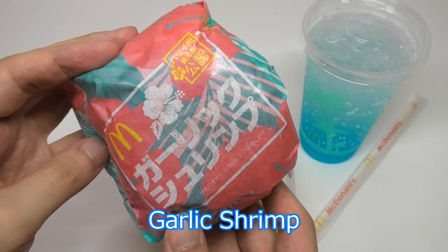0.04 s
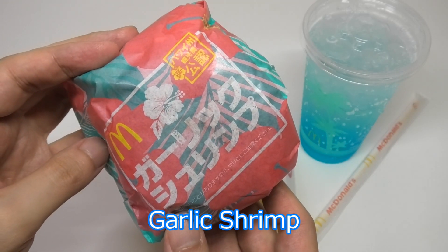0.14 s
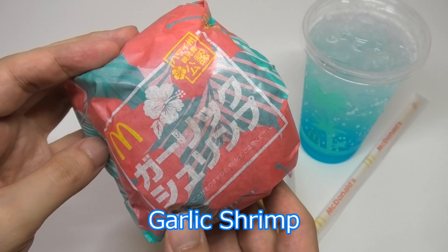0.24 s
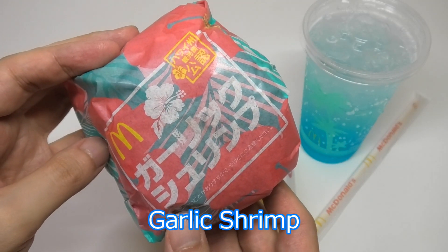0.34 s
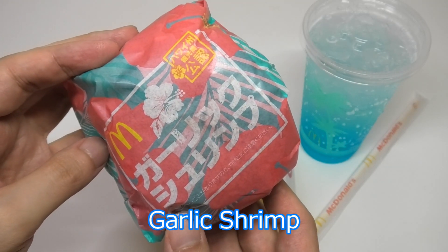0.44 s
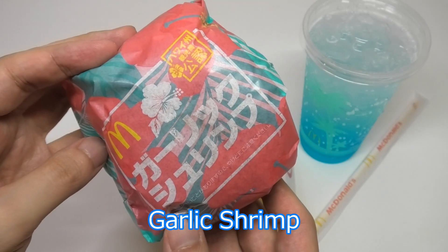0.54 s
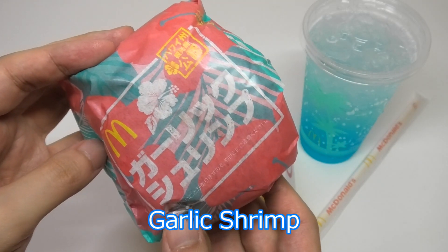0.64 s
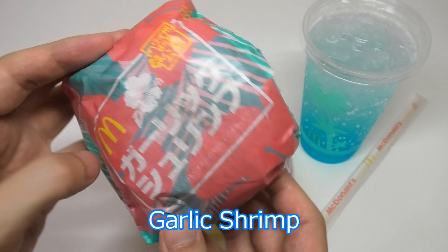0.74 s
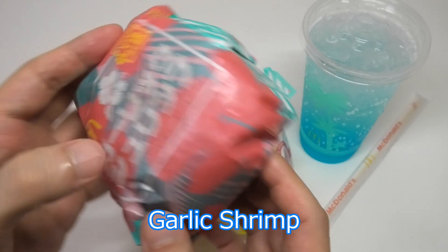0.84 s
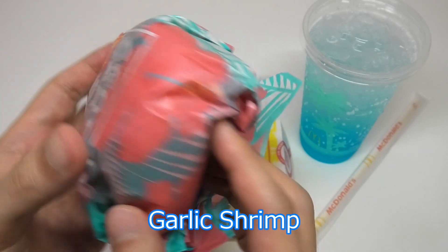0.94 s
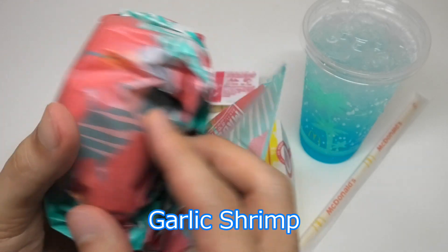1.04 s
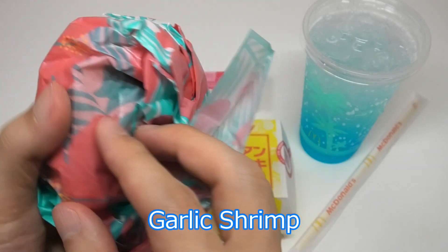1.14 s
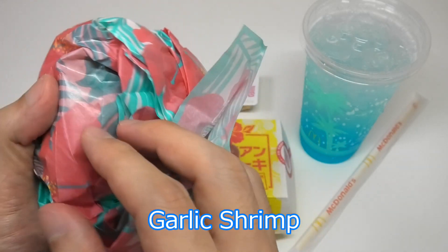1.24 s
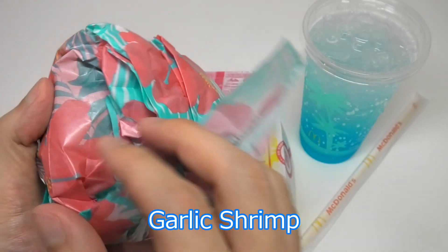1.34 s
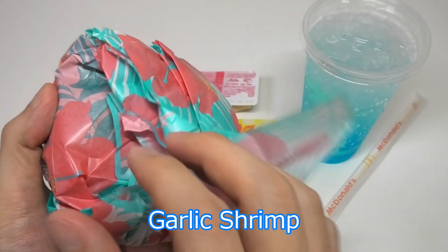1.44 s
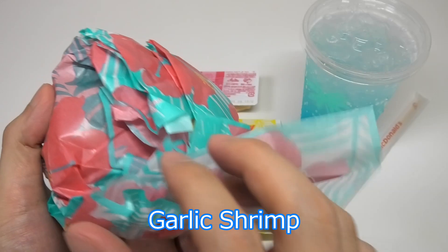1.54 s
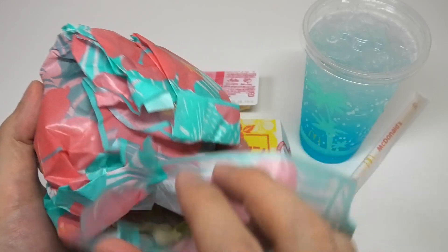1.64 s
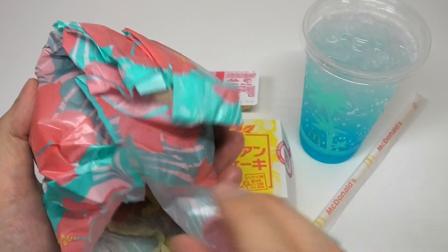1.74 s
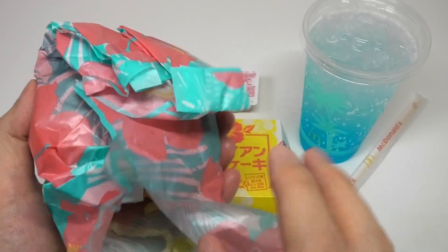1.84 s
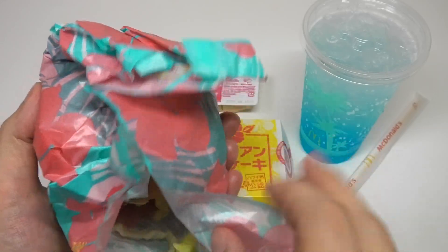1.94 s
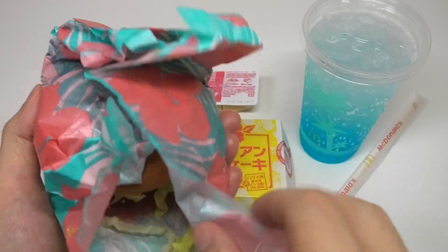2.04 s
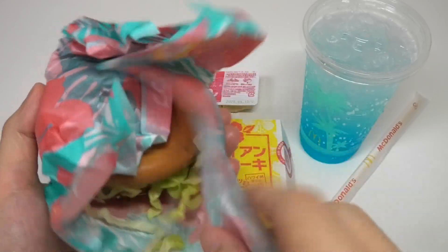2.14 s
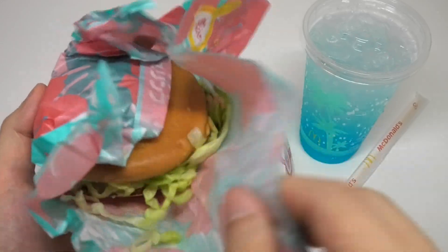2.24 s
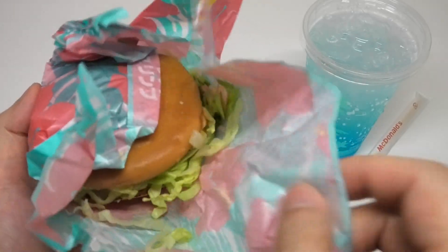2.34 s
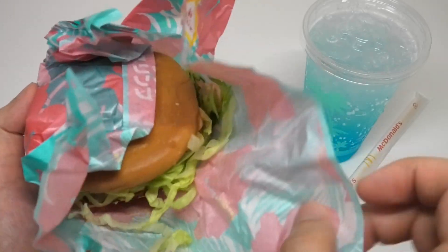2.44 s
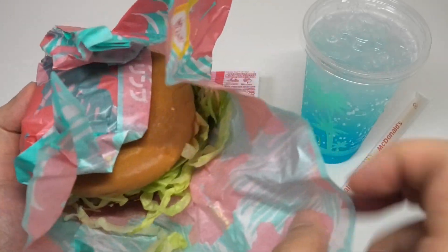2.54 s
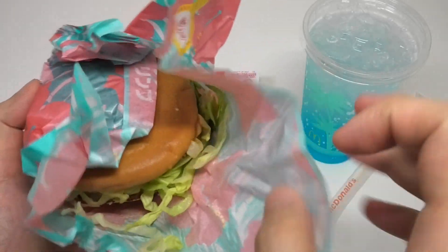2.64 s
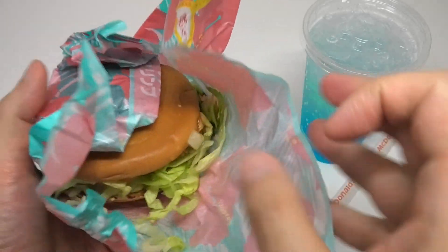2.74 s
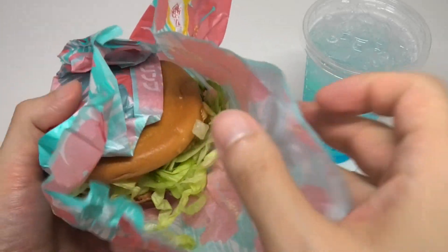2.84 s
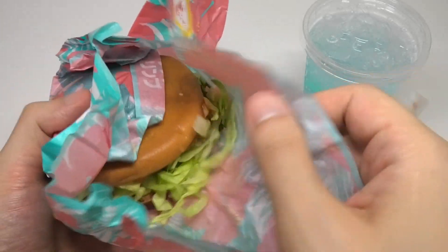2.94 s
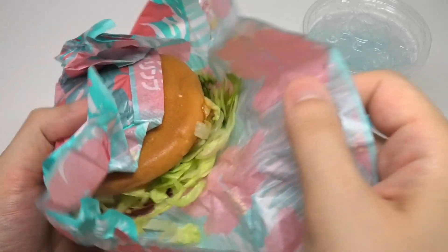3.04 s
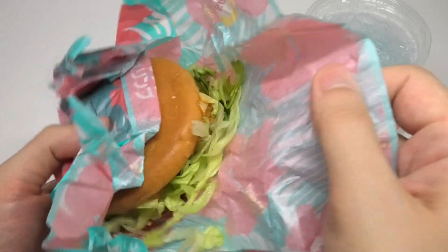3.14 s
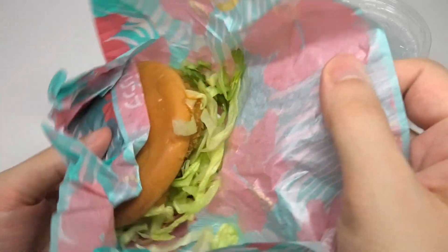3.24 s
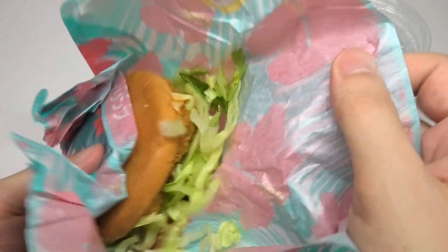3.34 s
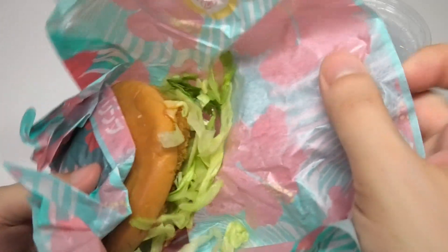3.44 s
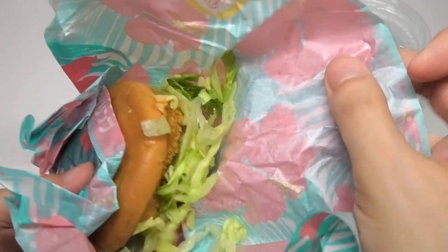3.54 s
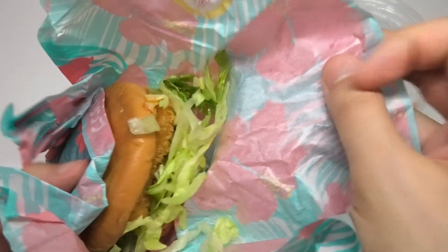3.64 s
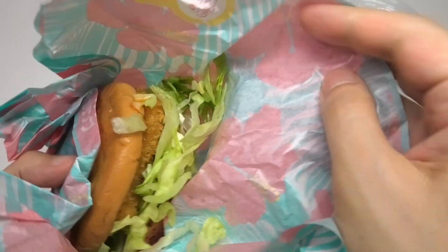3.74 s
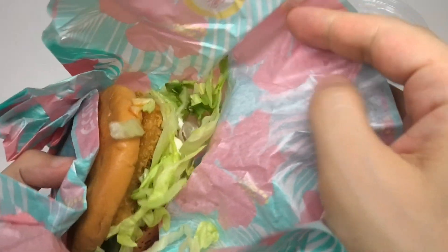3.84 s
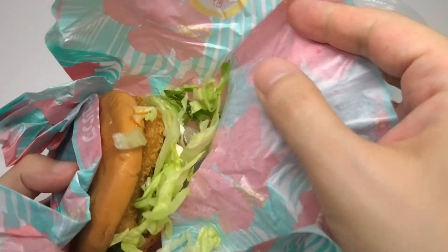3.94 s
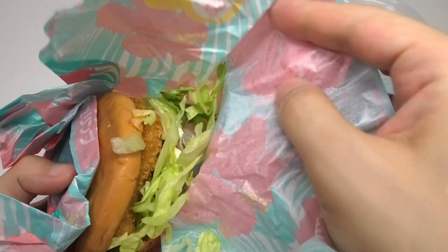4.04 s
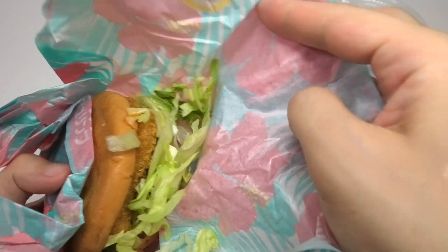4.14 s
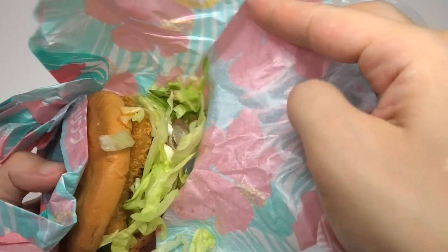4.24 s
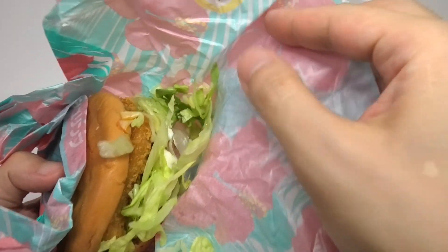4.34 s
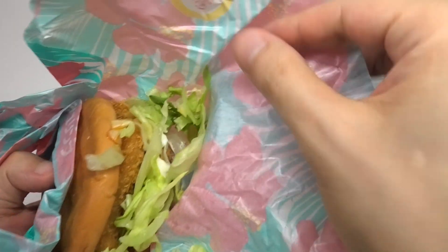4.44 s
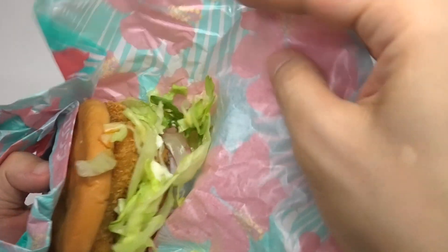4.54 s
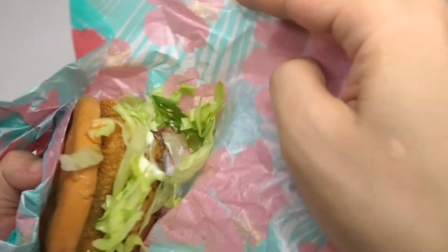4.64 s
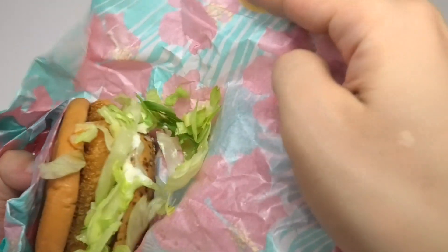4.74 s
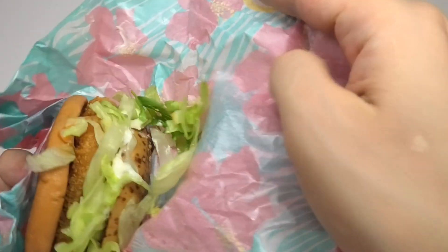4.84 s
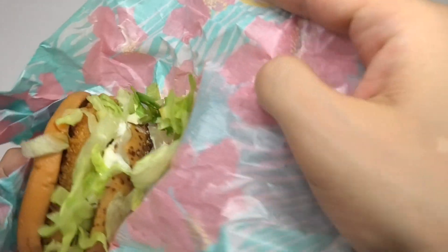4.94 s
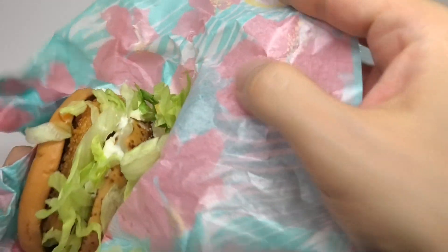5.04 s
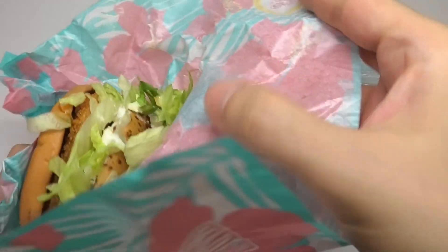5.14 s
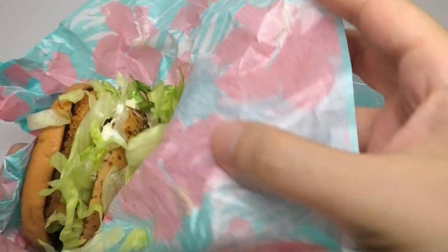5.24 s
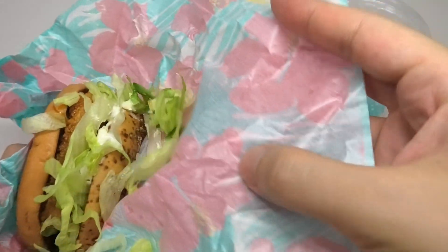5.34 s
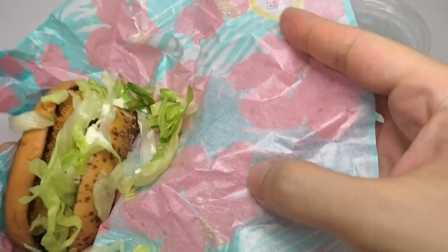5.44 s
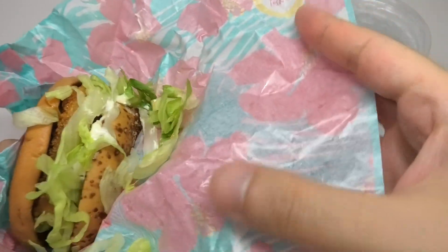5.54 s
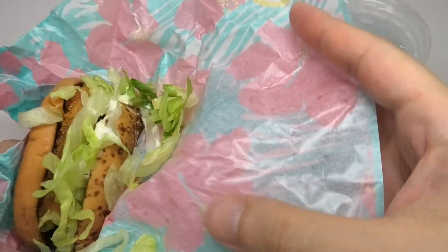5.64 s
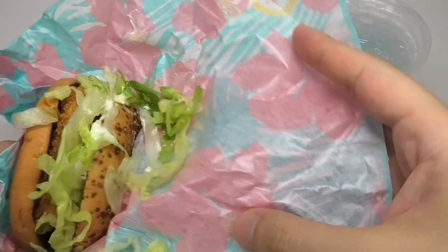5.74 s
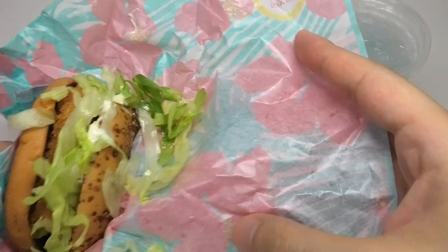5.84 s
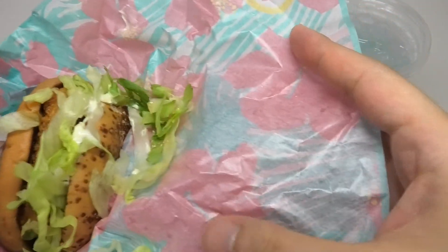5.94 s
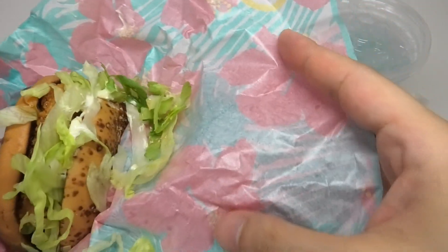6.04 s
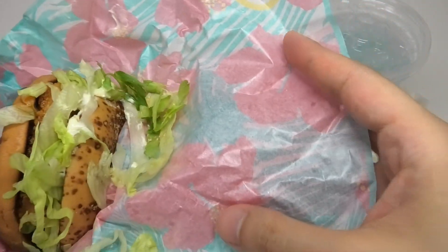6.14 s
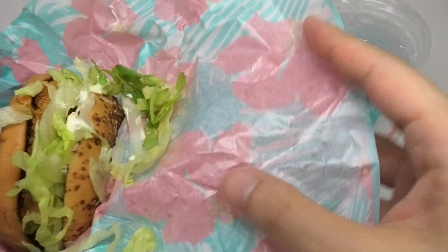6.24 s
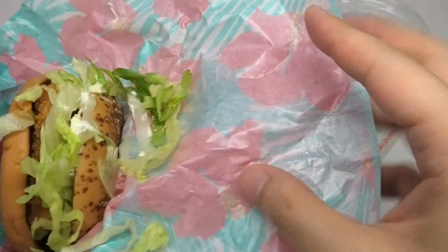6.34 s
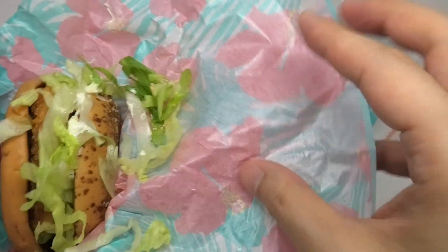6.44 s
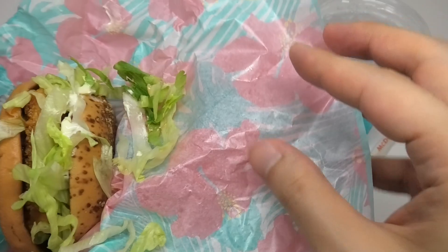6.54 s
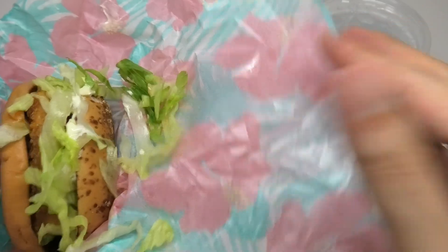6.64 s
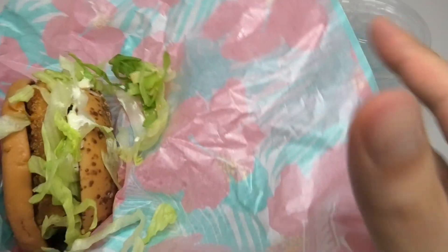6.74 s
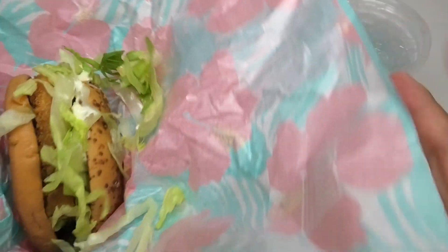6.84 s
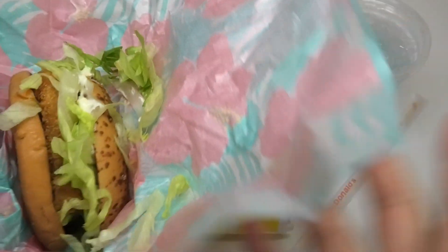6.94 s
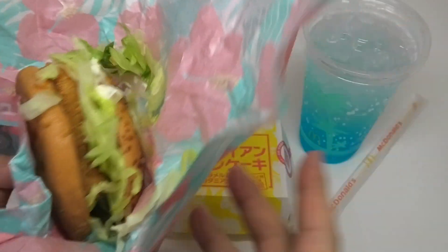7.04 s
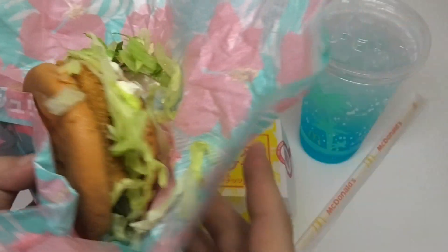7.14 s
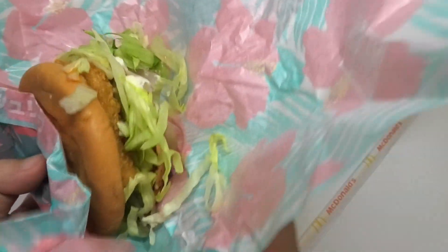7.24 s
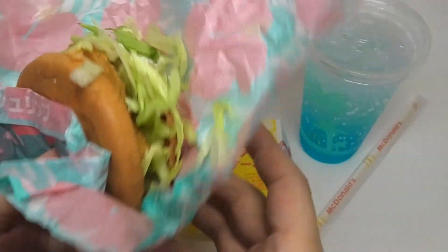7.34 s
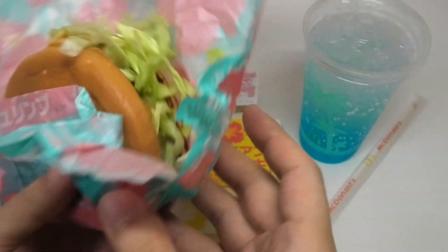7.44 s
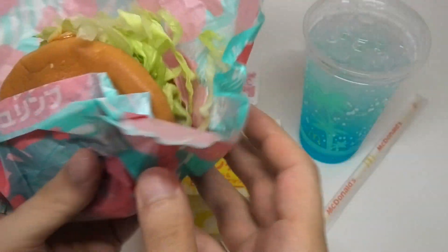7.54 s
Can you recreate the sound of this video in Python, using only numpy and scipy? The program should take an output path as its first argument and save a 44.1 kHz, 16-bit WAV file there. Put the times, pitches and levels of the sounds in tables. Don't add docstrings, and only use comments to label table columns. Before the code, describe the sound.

Close stereo pickup of a thin food wrapper handled in a small quiet room. About half a second of faint hiss and hum comes first, then a light touch and scattered crinkles. Snaps grow bright and dense as flaps are peeled back, stay busy while the sheet is pressed and smoothed, then thin out before a last flurry.

```python
import sys
import numpy as np
from scipy import signal
from scipy.fft import rfft, irfft, next_fast_len
from scipy.io import wavfile
from scipy.ndimage import uniform_filter1d, minimum_filter1d, map_coordinates

SR = 44100
rng = np.random.default_rng(int(sys.argv[2]) if len(sys.argv) > 2 else 0)


def to_wav(s):
    ch = np.atleast_2d(s).T
    pcm = np.round(np.clip(ch, -1, 1) * 32767)
    wavfile.write(sys.argv[1], SR, pcm.astype(np.int16))


def natural_amplitude(level_db):
    exponent = np.asarray(level_db, float) / 20
    return 10 ** exponent


N = 335160
FIRST_TOUCH_S = 0.63


def unit(x):
    return x / np.sqrt(np.mean(x ** 2) + 1e-20)


def along(points, hz):
    f, v = np.transpose(points)
    return np.interp(np.log(hz + 1), np.log(f + 1), v)


def wobble(rate):
    knots = rng.standard_normal(int(N * rate / SR) + 4)
    return map_coordinates(knots, [np.arange(N) * rate / SR])


def filtered(x, response):
    m = next_fast_len(N + SR // 2)
    return irfft(rfft(x, m) * response(np.fft.rfftfreq(m, 1 / SR)), m)[..., :N]


def mode(f, hz, width_hz):
    damping = 1j * f * width_hz
    return damping / (hz * hz - f * f + damping)


def causal(points, f):
    cepstrum = irfft(np.log(natural_amplitude(along(points, f)) + 1e-6))
    half = len(cepstrum) // 2
    cepstrum[1:half] *= 2
    cepstrum[half + 1:] = 0
    return np.exp(rfft(cepstrum))


def creases(s, db, hz, body_db, sparkle_db, pan_db, t60, spike, size):
    rise_s = 0.0012
    t, f = np.arange(size) / SR, np.fft.rfftfreq(2 * size, 1 / SR)
    chance = rng.standard_normal((len(s), 3, size))
    life = t60 * np.exp(0.35 * chance[:, :1, -1:])
    flutter = chance * natural_amplitude(-60 * t / life) * np.minimum(0.38 + t / rise_s, 1)
    flutter[:, 0, int(rise_s * SR * 0.8)] = -spike
    ports = flutter[:, :1] + 0.36 * flutter[:, 1:]

    hz, body_db = hz[:, None, None], body_db[:, None, None]
    body_hz = 620 * np.exp(0.34 * chance[:, 2:, -2:-1])
    ring = 0.64 + mode(f, hz, 0.23 * hz) - natural_amplitude(body_db + 10.5) * mode(f, body_hz, 330)
    bright_hz = 9200
    ring = ring * natural_amplitude(sparkle_db[:, None, None] * f ** 2 / (f ** 2 + bright_hz ** 2))
    neighbour_hz = 3300 * np.exp(0.57 * chance[:, :1, -2:-1])
    ring = ring - 0.55 * mode(f, neighbour_hz, 640)
    lead = 0.22 * chance[:, 2:, -1:]
    ring = ring * np.exp(lead * np.outer([1j, -1j], np.pi * f / SR))

    burst = irfft(rfft(ports, 2 * size) * ring)[..., :size]
    burst *= natural_amplitude(db)[:, None, None] / np.sqrt(np.sum(burst ** 2, (1, 2), keepdims=True))
    burst *= natural_amplitude(np.outer(pan_db, [0.5, -0.5]))[..., None]
    at = (np.round(s * SR).astype(int)[:, None] + np.arange(size)).ravel()
    return np.array([np.bincount(at, burst[:, c].ravel(), N + size)[:N] for c in range(2)])


def snaps():
    # (time [s], strength [dB], ring [Hz], sparkle [dB])
    buckling = [(0.6245, -20.5, 1480, 2.5), (0.6333, -23.5, 2900, 4), (0.7332, -13, 6600, 0),
                (0.742, -14.5, 1320, -26), (0.7644, -14, 2020, 6), (0.7973, -14.5, 3450, 5),
                (0.8249, -20, 2130, -1), (0.8317, -12, 3450, 10), (0.9073, -10, 7100, 13),
                (0.9147, -5.5, 5680, 16), (1.0346, -9, 1980, 5), (1.0751, -18, 4690, -5),
                (1.119, -7, 3400, -23), (1.1319, -7, 7060, 9), (1.1558, -13, 895, -9),
                (1.1823, -12, 1060, -14), (1.1906, -13.5, 2540, 0), (1.2392, -4, 3730, 14),
                (1.263, -9, 3000, 13), (1.3558, -15, 1110, -9), (1.389, -13.5, 3700, -2),
                (1.4477, -9, 3190, 8), (1.4581, -10.5, 4440, 4), (1.4636, -9, 2450, 4.5),
                (1.5198, -6, 7800, 1), (1.5641, -6, 3200, 5.5), (1.6179, -10, 3330, 5),
                (1.6535, -2.5, 7200, 14), (1.6744, -1, 3800, 12), (1.7212, -8.5, 4720, 3),
                (1.7381, -1, 7800, 15), (1.7865, -23, 4050, 7), (1.7948, -5.5, 920, -1),
                (1.8079, -4.5, 4600, 7), (1.8368, 3, 4060, 13.5), (1.8641, -7, 5250, 5),
                (1.8859, -6, 5000, 10), (1.9163, -1.5, 5500, 12), (1.9354, -5.5, 3030, 4.5),
                (1.9422, -9, 5000, -2), (2.0135, -15, 6500, -3), (2.0723, -7, 4820, 6.5),
                (2.1076, 0, 5800, 14), (2.1279, -3.5, 3020, 8.5), (2.1541, 3.5, 7050, 16),
                (2.1645, -4, 4090, 10.5), (2.2093, 5, 5370, 13), (2.2154, 1, 1030, 10.5),
                (2.2463, -6.5, 5770, 13), (2.2554, 1, 3330, 12),
                (2.277, -4, 5380, 14), (2.335, -4.5, 7400, 15), (2.3413, -9, 3400, 6),
               (2.3623, -2, 3340, 9.5), (2.41, -10.5, 3190, -9), (2.4186, 3, 4270, 12),
               (2.4683, -9, 2370, 6), (2.4756, 1.5, 4600, 9), (2.497, -18, 3010, 11),
               (2.5084, -4.5, 1920, 15.5), (2.5451, -13.5, 1040, -14), (2.5689, 1, 4700, 12),
               (2.583, -11, 4690, 9), (2.602, 0, 4770, 12), (2.6372, -4.5, 1380, 2.5),
               (2.6757, -3.5, 7450, 6.5), (2.7287, -6.5, 8500, 6.5), (2.752, -15, 2520, -10),
               (2.7746, -4.5, 3500, 8), (2.822, -9.5, 5700, 5), (2.8491, -13, 4520, 12),
               (2.8715, -7, 3700, 14), (2.9154, -16, 3010, -3), (2.925, -13, 7840, 5.0),
               (2.9673, -1.5, 4370, 7), (3.0323, -6, 5300, 7), (3.0664, -6, 6760, 2), (3.077, -8, 3270, 6),
               (3.1028, -5, 5800, 7), (3.107, 0.5, 910, 3), (3.1144, -9, 2070, 1.0), (3.1437, 8, 3280, 6.5),
               (3.162, -8, 3480, 1), (3.205, -1.5, 890, 5), (3.2309, 1, 3830, 12), (3.2493, -10, 5900, -5),
               (3.272, -5.5, 9040, 5), (3.3522, -2.5, 3060, 3.5), (3.406, 0, 3220, 10), (3.42, -5, 3720, 7),
               (3.4273, -5, 4440, 4.0), (3.435, -2, 3470, 7), (3.4413, 1, 3800, 7), (3.453, -10, 3750, -11),
               (3.4796, -5, 1290, -4), (3.49, -1.5, 4430, 7), (3.5556, -4, 3100, 6), (3.566, -3, 890, 2.5),
               (3.5971, -14, 4520, -7),
                (3.662, 1.5, 5250, 17.5), (3.681, -12, 1680, -5), (3.692, -11, 1540, -18),
                (3.7115, -5.5, 2230, 3), (3.741, 2.5, 5300, 6.5), (3.7817, -5, 5810, 5),
                (3.7899, 0.5, 3230, -5.5), (3.831, 2.5, 3220, 11.5), (3.8548, -10, 3120, 9),
                (3.8908, -0.5, 4440, 12.5), (3.9101, 0, 3160, 5.5), (3.923, -0.5, 4910, 3),
                (3.9421, 2.5, 5760, 6), (3.962, -1, 2260, 4.5), (4.0266, -1, 4700, 3.5),
                (4.0366, -3, 1440, 5), (4.0538, 1.5, 4130, 3), (4.063, -0.5, 5270, 4),
                (4.0754, -8, 2310, -4), (4.101, -9.5, 1530, 0), (4.148, -8, 2130, -5),
                (4.1566, -7, 7580, 7), (4.182, -6, 2370, 12), (4.189, -0.5, 6240, 11),
                (4.205, -4, 8010, 13.0), (4.215, -8, 5070, 7), (4.253, -12, 3400, -3),
                (4.2668, -4.5, 2120, -2), (4.313, 2, 5100, 11.5), (4.3363, -1.5, 8400, 10),
                (4.351, 0.5, 5800, 12), (4.376, -9, 7100, 10), (4.43, -10, 8000, 14), (4.447, 5, 4260, 9.5),
                (4.4805, -3, 6680, 9), (4.517, 9, 4740, 12.5), (4.5364, 3.5, 3260, 8.5),
                (4.543, 4.5, 3480, 7.5), (4.5499, 5, 4950, 11), (4.5747, 3, 2220, 11.5),
                (4.6369, 3, 3750, 10.5), (4.6471, 0, 7190, 2.5), (4.678, -5.5, 2180, 2),
                (4.6872, 3, 2600, 6), (4.709, -10, 3140, 6), (4.7317, -13, 3700, -2), (4.759, -1, 4690, 9),
                (4.792, 1, 5470, 7.5), (4.809, -4, 1120, 3.5), (4.823, -1.5, 5660, 16),
                (4.844, 2.5, 2350, 12),
                (4.8616, -4.5, 5600, 5.5), (4.912, -15.5, 4610, 3), (4.9531, -11, 3320, 2),
                 (4.973, -14, 5600, -6), (4.9831, -1.5, 3470, 4.5), (5.0007, -4.5, 5900, 9),
                 (5.012, -6, 6800, 7), (5.015, -5, 5900, 8.5), (5.0432, 4, 3580, 9), (5.065, -12, 1170, -4),
                 (5.083, -8.5, 1940, 1), (5.0881, -16, 7280, 7), (5.107, -9.0, 4260, 9),
                 (5.1396, -5.5, 3770, 4.5), (5.1506, -14, 3200, -1), (5.2966, -5.5, 3320, 9),
                 (5.31, -9, 4100, 6), (5.3432, -2, 3180, -1.5), (5.357, 3, 2110, 5.5),
                 (5.364, -5, 3360, -7), (5.372, -1, 3340, 3), (5.3905, 5, 3200, 17), (5.433, 0, 6550, 16),
                 (5.438, -1, 3130, -24), (5.461, -3, 3320, 8), (5.4771, -3.5, 1320, 9),
                 (5.4984, 2.5, 7800, 12), (5.506, -10, 5940, 1), (5.514, -9, 7320, 10),
                 (5.5315, -3, 6900, 8.0), (5.5573, -10, 3430, 1), (5.5641, -13.5, 2500, 3),
                 (5.71, -12.5, 5470, -1), (5.7164, -0.5, 5640, 8.5), (5.7234, -6, 5240, 5),
                 (5.7299, 9, 2600, 12.5), (5.7376, 1, 5130, 7), (5.771, 5.5, 2060, 15),
                 (5.782, -3, 4650, 9), (5.795, -8, 2630, 4), (5.8434, -14.5, 2840, -7),
                 (5.8782, -7, 4700, 2), (5.892, -11.5, 8200, 4), (5.906, -9, 4350, 9),
                 (5.917, -13.5, 2860, 1), (6.004, -19.5, 2120, -19), (6.019, -2, 2900, 10),
                 (6.0263, -3.5, 6740, 8), (6.041, -3, 5250, 5),
                (6.055, -16, 5250, -10), (6.076, -12, 4630, 4), (6.1604, -13, 1400, -6),
                (6.179, -19, 5460, -13), (6.2392, -8.5, 2800, 4.5), (6.2617, -13, 5460, 8),
                (6.313, -17, 7500, 0), (6.3295, -14, 3420, 3), (6.334, -5, 4650, 14),
                (6.3425, -4, 5030, -13), (6.3796, 0, 5810, 9.5), (6.412, -19, 6120, 6),
                (6.42, 3.5, 2520, 10.5), (6.429, -2.5, 3400, 10), (6.438, -4.5, 6340, 8),
                (6.451, -7, 3600, 5), (6.5012, -13, 5730, 4), (6.519, -9.5, 2700, -7),
                (6.549, -15, 5000, 7), (6.6534, -20, 5340, 1), (6.6814, -22, 3140, -11),
                (6.7034, -10, 1020, -11), (6.7147, -16, 3450, 9), (6.801, -8, 7800, 20),
                (6.8153, -13.5, 1400, -24), (6.896, -12.5, 3490, 5), (6.904, -4.5, 9200, 4),
                (6.9138, -12.5, 3600, -4), (6.946, -15, 2070, 0), (6.9658, -10, 2540, 9),
                (7.008, -15.5, 3100, 6), (7.0478, -11.5, 8100, 8), (7.062, -17.5, 1410, -4),
                (7.072, -17.5, 4180, -7), (7.1353, -12.5, 2960, 9), (7.1572, -11, 1460, -14),
                (7.1671, -4, 8000, 18), (7.1757, -11, 8870, -3), (7.2212, -4, 8250, 4.5),
                (7.244, -11, 8100, 15), (7.2655, -16.5, 2540, 1), (7.305, -12, 1510, 1),
                (7.3546, -13.5, 5600, -3), (7.399, -1, 4860, 17), (7.4217, -5, 1760, 1.5),
                (7.4465, -15, 2000, 0), (7.4515, -5, 2840, 1), (7.473, -17, 4600, 14),
                (7.499, -7.5, 3490, 6), (7.505, -8, 9000, 14), (7.5286, -14, 8900, -6),
                (7.5368, 2, 3510, 10.5), (7.5634, -8.5, 4070, 6),
                (0.59, -41, 3000, 0),
        (1.138, 0, 12000, 24),
        (5.638, -23, 3960, 5),
        (5.67, -24, 5000, -3),
        (5.957, -17, 8650, 16),
    ]
    s, db, hz, sparkle_db = np.array(buckling).T
    pick = rng.random((len(s), 2))
    spread_db = 3.5
    pan_db = spread_db * 2 * (pick[:, 0] - 0.5) - 0.8
    body_db = -19 - 4 * np.log2(hz / 3000) + 12 * (pick[:, 1] - 0.5)
    kick = 5.5 * natural_amplitude(0.12 * db)
    return creases(s, db + 6.5, hz, body_db, 2.0 * (sparkle_db - 3.5), pan_db,
                   t60=0.016, spike=kick, size=768)


def pops():
    # (time [s], peak [dB], ring [Hz])
    panels = [(0.738, -37, 396), (1.154, -33, 910), (1.794, -24, 740), (2.003, -32, 1150),
              (2.418, -25.5, 634), (2.545, -41, 1180), (2.773, -30.5, 900), (2.965, -26, 840),
              (3.106, -23, 740), (3.689, -27, 830), (4.053, -36, 694), (4.514, -25.5, 1180),
              (4.642, -28.5, 720), (4.794, -26.5, 690), (5.436, -38, 710), (6.02, -31, 1060),
              (6.34, -35, 965), (6.449, -28.5, 750), (6.702, -27, 920), (6.813, -47, 1010),
              (6.944, -33, 850), (7.176, -33, 780), (7.303, -35.5, 750), (7.45, -24, 700)]
    s, db, hz = np.transpose(panels)
    t = np.arange(SR // 20) / SR
    tone = natural_amplitude(db + 5.0)[:, None] * np.sin(2 * np.pi * np.outer(hz, t))
    knock = tone * natural_amplitude(-60 * t / 0.021) * (1 - np.exp(-t / 0.0018))
    at = np.round(s * SR).astype(int)[:, None] + np.arange(len(t))
    return np.bincount(at.ravel(), knock.ravel(), N + len(t))[:N]


def effort(t):
    # (time [s], crackle level [dB])
    grip = [(0.73, -76), (0.9, -55), (1.02, -38), (1.46, -44.5), (1.84, -46.5), (2.91, -38), (3.1, -33),
            (4.02, -39), (4.52, -46.5), (4.65, -39), (5.65, -46), (7.41, -46.5), (7.6, -40.5)]
    # (strongest moment [s], swell [s], fade [s], crackle level [dB])
    pulls = [(0.93, 0.52, 0.063, -41), (1.13, 0.063, 0.081, -39), (1.68, 0.083, 0.1, -36),
             (1.85, 0.16, 0.17, -36), (2.011, 0.013, 0.062, -40), (2.13, 0.048, 0.061, -34),
             (2.22, 0.042, 0.087, -29.5), (2.41, 0.084, 0.059, -37), (2.979, 0.023, 0.024, -32.5),
             (3.11, 0.14, 0.024, -32), (3.37, 0.046, 0.061, -46), (3.43, 0.041, 0.087, -40),
             (3.7, 0.092, 0.43, -39), (3.93, 0.083, 0.022, -36.5), (4.05, 0.052, 0.021, -35),
             (4.18, 0.037, 0.06, -31), (4.331, 0.045, 0.025, -34.5), (4.538, 0.061, 0.026, -30),
             (4.67, 0.17, 0.13, -33), (5.022, 0.038, 0.12, -38), (5.36, 0.049, 0.046, -33.5),
             (5.488, 0.073, 0.18, -33), (5.73, 0.024, 0.062, -35.5), (5.9, 0.021, 0.026, -47),
             (6.032, 0.011, 0.029, -35.5), (6.411, 0.05, 0.049, -34.5), (6.72, 0.043, 0.078, -42.5),
             (6.9, 0.071, 0.2, -45), (7.46, 0.13, 0.1, -39.5)]
    # (time [s], half length [s], hush [dB])
    rests = [(0.796, 0.037, 8), (2.057, 0.011, 15), (2.71, 0.01, 15), (2.756, 0.017, 9), (3.295, 0.046, 8),
             (4.484, 0.022, 17), (5.23, 0.02, 3.5), (5.617, 0.066, 16), (5.852, 0.034, 5),
             (5.985, 0.032, 13), (6.183, 0.028, 9), (6.635, 0.012, 2.5), (6.989, 0.014, 14),
             (7.133, 0.019, 11), (7.278, 0.025, 6.5), (7.379, 0.011, 8)]
    grip_db, first_touch_db, pull_edge_db = -1, -58.5, 10
    held = natural_amplitude(2 * (np.interp(t, *np.transpose(grip), left=-120) + grip_db))
    total = held + (t > FIRST_TOUCH_S) * natural_amplitude(2 * first_touch_db) + 1e-30
    for s, swell_s, fade_s, db in pulls:
        phase = np.where(t < s, (s - t) / swell_s, (t - s) / fade_s)
        pull_db = db - pull_edge_db * np.minimum(phase, 5) ** 2
        total = total + (t > grip[0][0]) * natural_amplitude(2 * pull_db)
    hush_db = sum(db * np.exp(-((t - s) / half_s) ** 4) for s, half_s, db in rests)
    return 10 * np.log10(total) - hush_db


def effort_curve():
    steps = np.arange(0, N, 64) / SR
    return np.interp(np.arange(N) / SR, steps, effort(steps))


def crackle(count):
    crowd = np.cumsum(natural_amplitude(2.5 * wobble(60)) * (np.arange(N) > FIRST_TOUCH_S * SR))
    pick = rng.random((count, 6))
    when = np.interp(pick[:, 0], crowd / crowd[-1], np.arange(N) / SR)
    effort_db = effort(when)
    db = effort_db + 22.0 - 2.28 * np.log(pick[:, 1] + 0.04)
    hz = 1100 * 7 ** pick[:, 2]
    thump_db = 7 * np.log(pick[:, 4] + 0.02)
    body_db = -6 + 0.22 * (effort_db + 52) + thump_db
    sparkle_db = 2.8 * 7 * (pick[:, 5] - 0.55)
    pan_db = 5 * (pick[:, 3] - 0.5) - 0.8
    return creases(when, db, hz, body_db, sparkle_db, pan_db, t60=0.008, spike=3.46, size=384)


def rub():
    rub_top_hz = 11000
    level_db = effort_curve()
    shared, own = rng.standard_normal(N), rng.standard_normal((2, N))
    hiss = filtered(shared + 0.55 * own, lambda f: 1 / (1 + 1j * f / rub_top_hz))
    return natural_amplitude(level_db - 2.5 + 4.4 * wobble(35)) * hiss


def room(x):
    # (frequency [Hz], t60 [s])
    decay = [(300, 0.12), (2000, 0.35), (6000, 0.29), (14000, 0.11)]
    # (frequency [Hz], share [0-1])
    common = [(300, 0.52), (1000, 1), (4000, 0.12), (10000, 0.041)]
    hz, t, z = signal.stft(rng.standard_normal((3, SR // 3)), SR, nperseg=256)
    share = np.clip(along(common, hz), 0, 1)[:, None]
    z = np.sqrt(share) * z[2] + np.sqrt(1 - share) * z[:2]
    tail = signal.istft(z * natural_amplitude(-60 * t / along(decay, hz)[:, None]), SR, nperseg=256)[1]
    late = np.pad(x.mean(0), (200, 0))[None]
    return signal.fftconvolve(late, tail / np.linalg.norm(tail[0]), axes=1)[:, :N]


def rumble():
    rumble_hz, rumble_db, grows = 114, -86.5, 0.66
    level_db = grows * (effort_curve() + 40)
    shake = rng.standard_normal((2, N)) + 0.98 * rng.standard_normal(N)
    low = unit(filtered(shake, lambda f: 1 / (1 + (f / rumble_hz) ** 4) * f / (f + 15)))
    return natural_amplitude(rumble_db + level_db + 3.5 * wobble(6.3)) * low


def background():
    # (frequency [Hz], gain [dB])
    air_colour = [(15, -46), (25, -19), (149, -4), (270, -0.5), (531, 1.5), (14800, -21), (16000, -17.5)]
    # (frequency [Hz], correlation [-1 to 1])
    air_likeness = [(60, 0.11), (600, 0.057), (3000, .06), (15000, 0.091)]
    # (frequency [Hz], width [Hz], level [dB])
    hum = [
        (288, 46, -86),
        (542, 83, -79.5),
    ]
    # (frequency [Hz], level [dB])
    whine = (15685, -88)

    def mid_side(f):
        angle = np.arccos(np.clip(along(air_likeness, f), -1, 1)) / 2
        return natural_amplitude(along(air_colour, f)) * [np.cos(angle), np.sin(angle)]

    mid, side = filtered(rng.standard_normal((2, N)), mid_side)
    air = natural_amplitude(-68) * unit(np.array([mid + side, mid - side]))
    for hz, width_hz, db in hum:
        band = unit(filtered(rng.standard_normal(N), lambda f: mode(f, hz, width_hz) ** 2))
        air += natural_amplitude(db + 4.8 * wobble(6)) * band
    whine_hz, whine_db = whine
    return air + natural_amplitude(whine_db) * np.sqrt(2) * np.sin(2 * np.pi * whine_hz * np.arange(N) / SR)


def scene():
    # (frequency [Hz], gain [dB])
    paper_colour = [(88, -41), (439, -9), (716, -3), (1120, -2.5), (3220, -1.5), (7620, -4), (10200, -9),
                    (13000, -17), (16000, -11.5)]
    lead = 1.44
    sources = snaps() + pops() + crackle(count=4000) + rub()
    paper = filtered(sources, lambda f: causal(paper_colour, f))
    near = filtered(paper, lambda f: np.exp(np.outer([1j, -1j], np.pi * f * lead / SR)))
    return near + natural_amplitude(-15) * room(paper) + background() + rumble()


def drop_weak_treble(x):
    treble_hz, threshold_db = 10300, -17
    treble = filtered(x, lambda f: f > treble_hz)
    energy = np.abs(uniform_filter1d(np.sum(treble ** 2, 0), size=128))
    peak = -minimum_filter1d(-energy, size=1400)
    lost = minimum_filter1d(np.float64(energy < peak * natural_amplitude(2 * threshold_db)), size=320)
    lost = -minimum_filter1d(-lost, size=320)
    return x - treble * uniform_filter1d(lost, size=64)


def band_limit(x):
    return signal.sosfilt(signal.butter(12, 16980, fs=SR, output="sos"), x)


def record(dry):
    mix = drop_weak_treble(filtered(dry, lambda f: f < 15900))
    return band_limit(mix)


dry = scene()
out = record(dry)
to_wav(out)
```